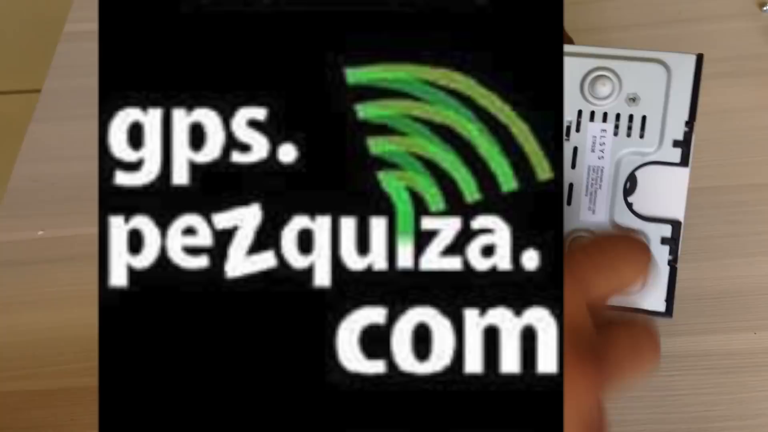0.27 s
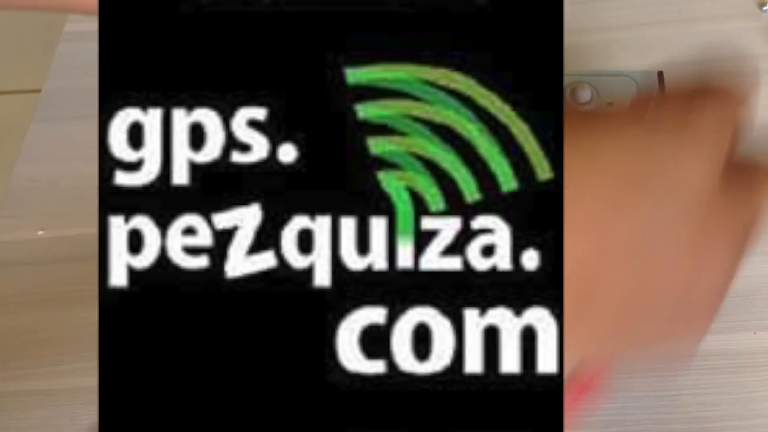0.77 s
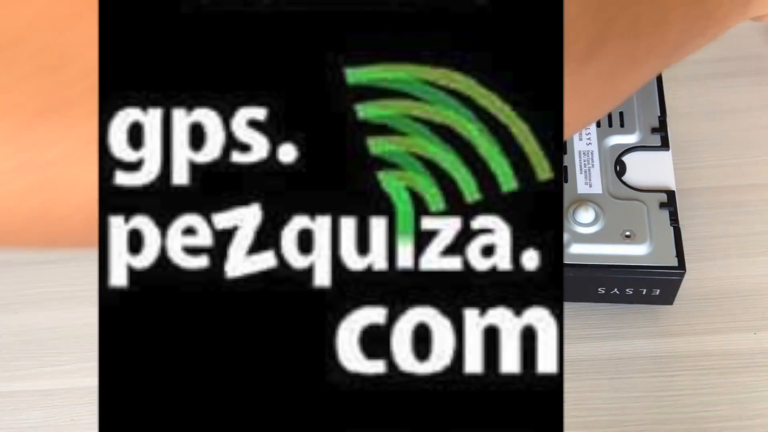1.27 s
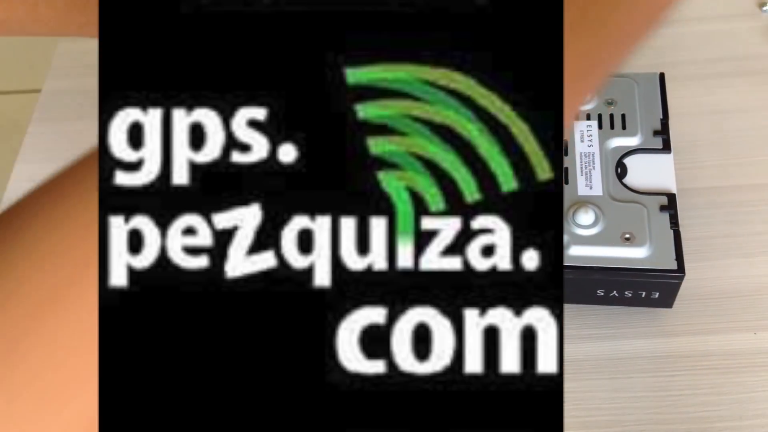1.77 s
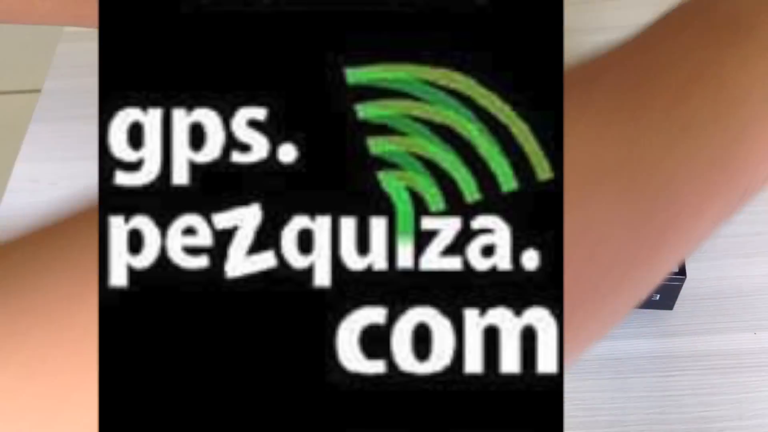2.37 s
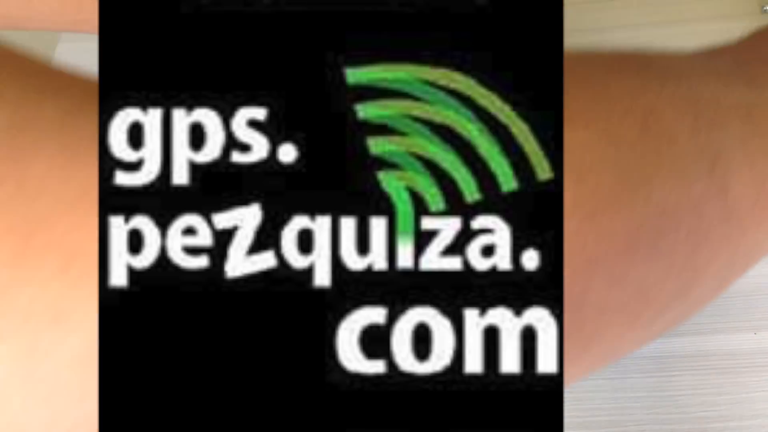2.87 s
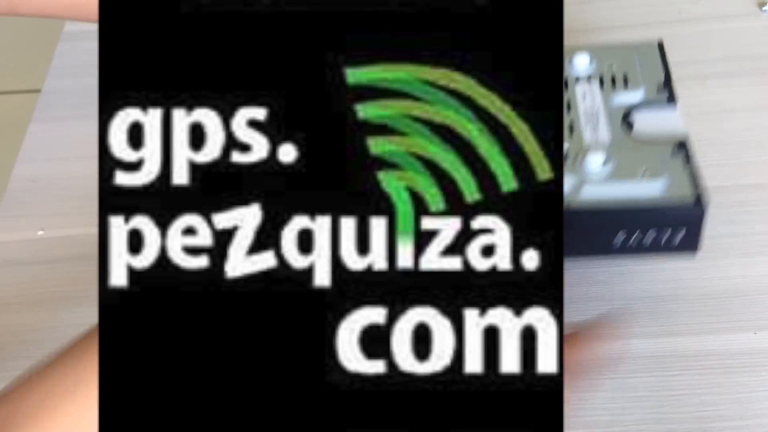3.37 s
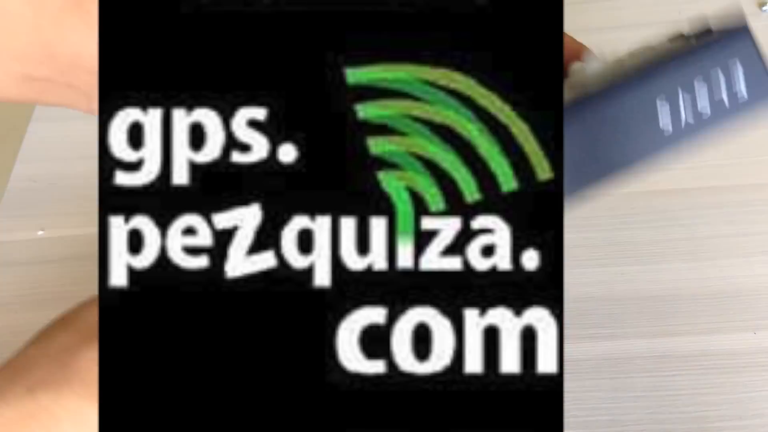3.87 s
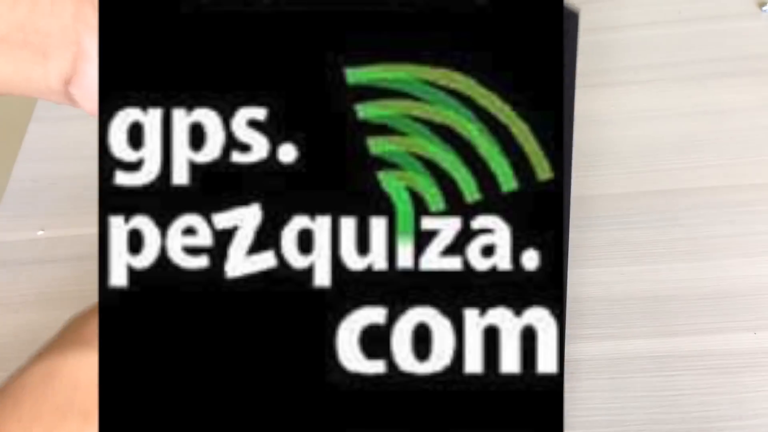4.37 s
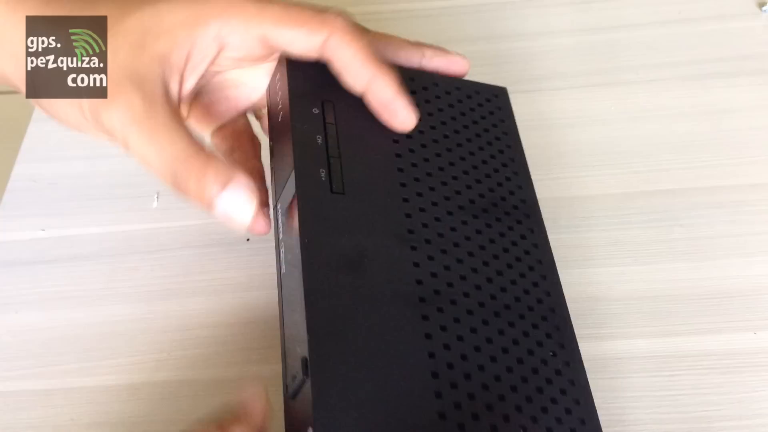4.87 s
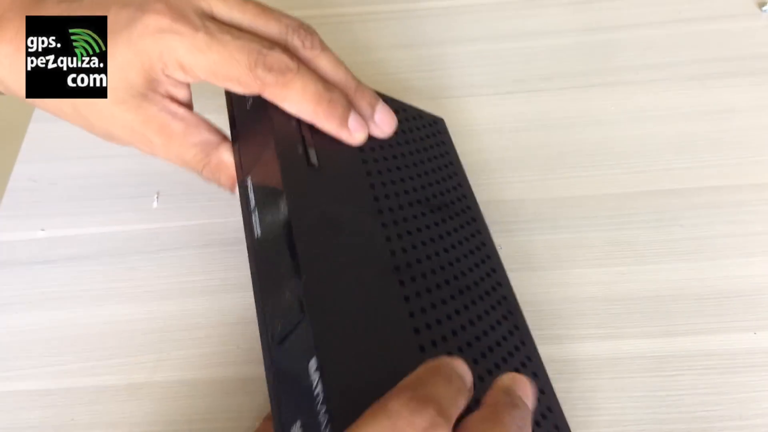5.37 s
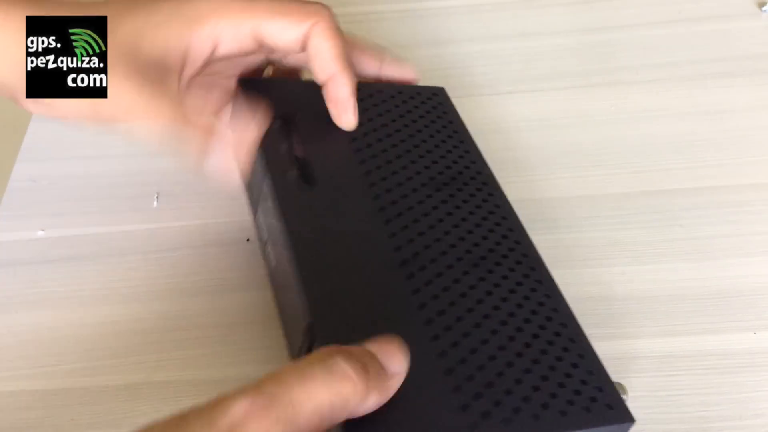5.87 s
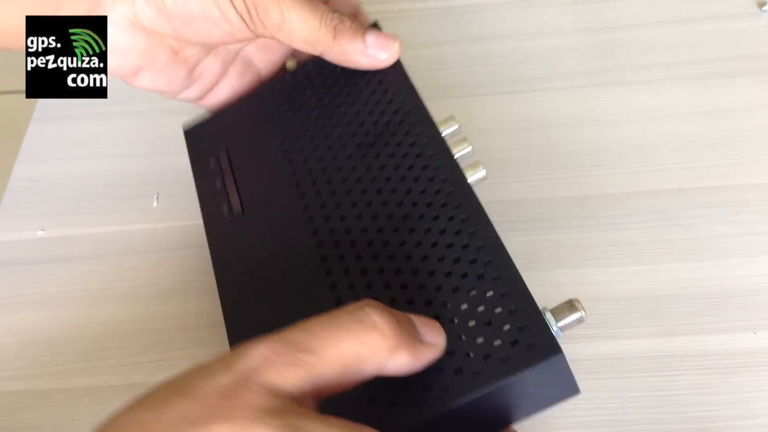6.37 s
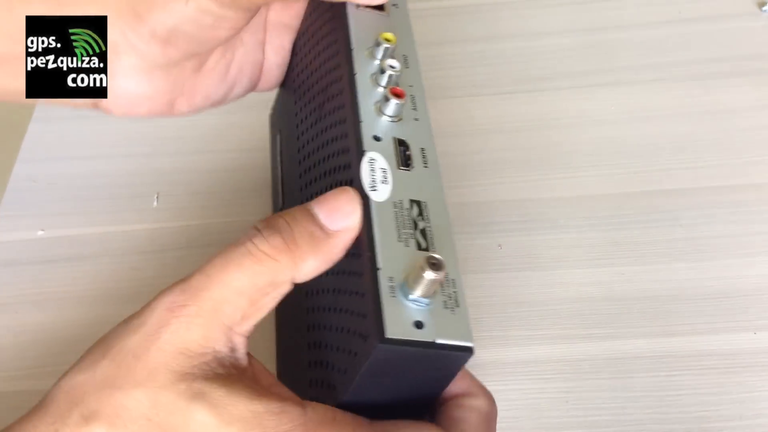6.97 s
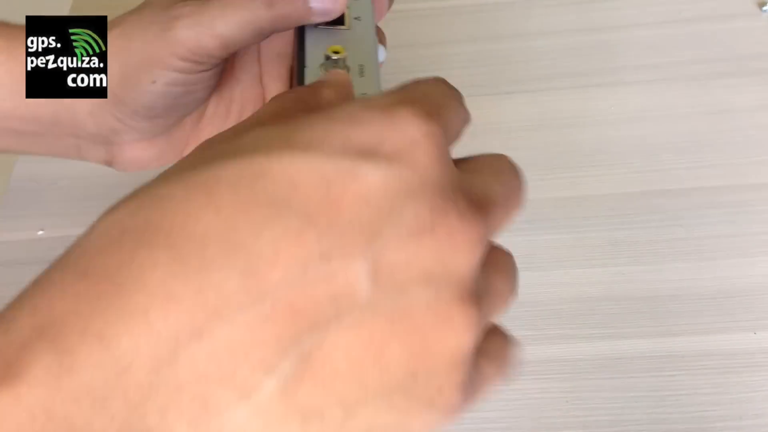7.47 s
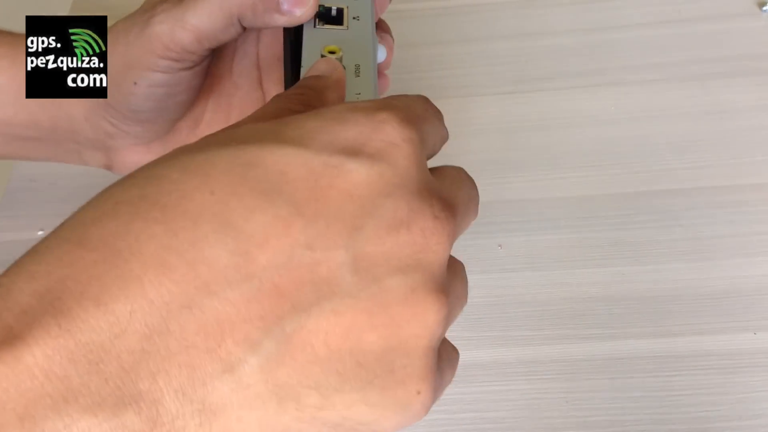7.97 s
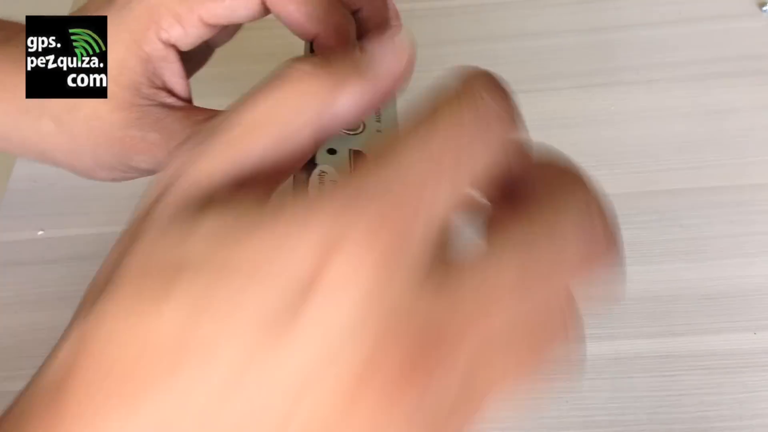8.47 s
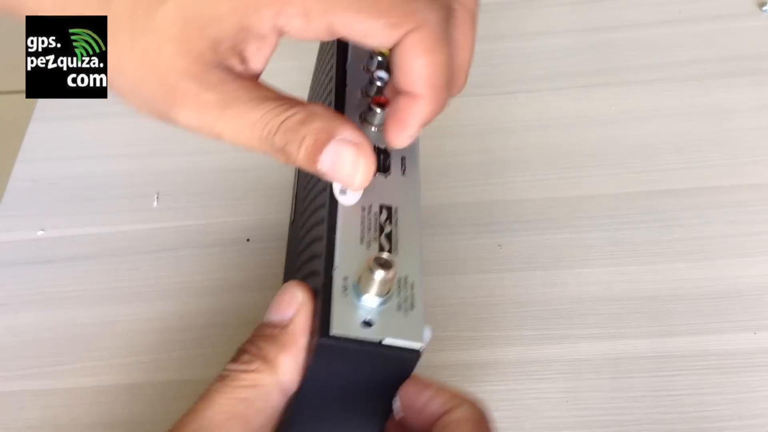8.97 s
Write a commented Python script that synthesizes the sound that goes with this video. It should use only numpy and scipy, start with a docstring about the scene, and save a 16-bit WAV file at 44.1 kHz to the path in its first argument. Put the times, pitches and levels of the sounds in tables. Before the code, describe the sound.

A small screw ticks to rest, a screwdriver clatters down, then a sheet-metal case is lifted and turned with hard clacks, hollow thuds and rubbing.

```python
"""Close mono take of hands working on a small sheet-metal and plastic case on a wooden table, in a quiet room.
First the cover clacks, the hollow body thuds and fingers rub it: noise bursts, decaying modes, stick-slip noise.
Then a screwdriver touches down, a small screw bounces to rest in quickening ticks, and the tool is put down
with a clatter. Last the case is lifted, turned over and gripped: louder clacks and thuds, an edge juddering
in runs of clacks, scrapes, and squeaks of unsteady tone. Filtered noise is the hush throughout."""
import sys
import numpy as np
from scipy import signal
from scipy.fft import rfft, irfft, next_fast_len
from scipy.io import wavfile
from scipy.ndimage import uniform_filter1d, map_coordinates

SR = 44100
rng = np.random.default_rng(int(sys.argv[2]) if len(sys.argv) > 2 else 0)


def output_pcm(signal):
    """Save a mono or channel-first signal as 16-bit PCM at the path in sys.argv[1].

    Samples are clipped to [-1, 1] before scaling.
    """
    pcm = np.clip(np.atleast_2d(signal).T, -1, 1) * 32767
    wavfile.write(sys.argv[1], SR, np.round(pcm).astype(np.int16))


N = 406161  # length, samples

# Event levels are nominal: the room, the table path and trims in the functions act on them too.
# room air and microphone hiss: [freq_hz, density_db]
HUSH_SPECTRUM = [(15, -63), (25, -35), (49, -10.5), (91, -7.5), (313, -2), (550, -8), (646, -9.5),
                 (967, -9.5), (1330, -13), (2170, -13), (2760, -12), (13800, -16), (15400, -17)]
HUSH_DB = -70  # rms level
# decay of the room's answer: [freq_hz, t60_s]
ROOM_DECAY = [(100, 0.91), (250, 0.3), (700, 0.43), (2500, 0.33), (6000, 0.29), (12000, 0.16)]
# the table top carries the sound to the microphone, with a null in the bass: [freq_hz, gain_db]
TABLE_PATH = [(25, -7.5), (50, -9.5), (85, -3.5), (102, -7.5), (121, -30), (145, 2.5), (400, -1),
              (18000, 1)]
TOP_HZ = 15450  # upper band limit at the microphone

# hard contacts of cover and chassis:
# [strike_s, level_db, centre_hz, panel_db (relative), crack_db (relative), clack_t60_s]
CLACKS = [(0.116, -34.5, 2640, -6.5, -14.5, 0.02), (0.1475, -36, 2930, -3.5, -11.5, 0.028),
          (0.161, -44.5, 960, -2, -18, 0.033), (0.6893, -47.5, 1020, 0, -18, 0.023),
          (0.9024, -56.5, 960, 11, -18, 0.01), (2.8354, -32, 1940, -9.5, -18, 0.018),
          (2.848, -38, 2950, -15, -16, 0.021), (2.8738, -44, 1936, -3, -21.5, 0.07),
          (3.8534, -11.5, 1700, -12, -12, 0.017), (4.0672, -47.5, 1300, -11, -30.5, 0.024),
          (4.4808, -44, 2560, -7, -19, 0.014), (4.9185, -44, 1520, -3.5, -33, 0.027),
          (5.2824, -55, 1656, -5, -20, 0.035), (5.4049, -20, 1605, 1.5, -18, 0.017),
          (5.4089, -27.5, 2870, -4, -14, 0.017), (6.1632, -49.5, 3560, -14, -25, 0.028),
          (6.2811, -24.5, 2960, -31, -17, 0.017), (6.4327, -35.5, 1950, -28.5, -24, 0.015),
          (6.8347, -49.5, 2910, -12, -15.5, 0.045), (7.0578, -36, 1770, 5, -20, 0.032),
          (7.5044, -33, 1445, -4.5, -30, 0.022), (8.3214, -52, 807, -18, -14, 0.031)]
# spectra of the clack, the duller panel slap and the bright crack: [freq_hz, density_db]
CLACK_SPECTRUM = [(700, -21), (1300, -1.5), (1670, -1.5), (1870, -0.5), (2080, -1), (2450, -.5), (2650, -6),
                  (2950, -3.5), (3550, -2), (4200, -3.5), (5400, -5), (8000, -17.5)]
SLAP_SPECTRUM = [(200, -16), (450, -3), (650, -0.5), (950, -1.5), (1300, -9.5), (2000, -20.5)]
CRACK_SPECTRUM = [(4500, -34), (7000, 1), (8200, -6.5), (9200, -1.5), (10800, -8), (12300, -4),
                  (14000, -15), (15500, -15.5)]
# ring of the steel chassis: [freq_hz, level_db, t60_s]
STEEL_MODES = [(984, -10, .08), (1240, -8, .08), (1665, 0, .12), (2040, -1, .12), (2448, -4, .09),
               (2823, -4, .09), (3030, -5, .08), (3541, -4, .12), (3784, -7, .1), (4258, -7, .1),
               (4453, -7, .1), (4856, -7, .11), (5181, -5, .12)]

# soft blows on the hollow case, damped more by a firm grip:
# [start_s, thud_db, panel_db (relative), boom_db (relative), thud_t60_s]
KNOCKS = [(0.154, -55, -12, -23, 0.089), (0.438, -50, -21, -23, 0.035), (0.618, -41.5, -29, -32, 0.13),
          (0.8, -36.5, -14, -38, 0.11), (2.785, -49, -23, -11, 0.23), (3.855, -21.5, -7.5, -18, 0.14),
          (3.912, -28.5, -7.5, -18, 0.17), (4.038, -32, -8.5, -28, 0.12), (4.067, -32, -10, -29, 0.081),
          (4.142, -15.5, -10, -19.5, 0.082), (4.195, -33, -2, -22, 0.06), (4.404, -27, -5.5, -11, 0.11),
          (4.479, -22.5, -10.5, -17, 0.11), (4.755, -42, -1.5, -20, 0.072), (4.92, -46.5, -6.5, -20, 0.22),
          (5.113, -45, 1, -22, 0.1), (5.272, -52, 3.5, -20, 0.11), (5.406, -19, -7.5, -33, 0.061),
          (5.522, -34.5, 7, -25.5, 0.13), (5.573, -41, 2, -27, 0.079), (5.6, -31.5, 1.5, -31, 0.091),
          (6.061, -40, -21, -9, 0.2), (7.058, -27, 2, -18, 0.033), (7.076, -36, -14.5, -19, 0.1),
          (7.505, -34.5, 1, -18, 0.066), (7.746, -46.5, -15, -23, 0.065), (8.215, -52.5, -9, -24, 0.05),
          (8.32, -38, -11, -17, 0.092), (8.457, -46.5, -21.5, -10, 0.053), (8.714, -53.5, -22, -16, 0.04),
          (8.829, -53, -10, -20, 0.058), (8.975, -32.5, -6.5, -22, 0.064)]
# resonances of the hollow body: [freq_hz, level_db]
BODY_MODES = [(158, -0.5), (192, 11.5), (230, -12.5)]
# bending modes of the panels: [freq_hz, level_db, t60_s]
PANEL_MODES = [(295, -2, 0.081), (358, -0.5, 0.11), (377.5, 3, 0.052), (426, -1.5, 0.0854),
               (479, 0.5, 0.056), (537, -9, 0.14), (603, 1, 0.0313), (659, -6.5, 0.062), (830, -12, 0.044)]

# finger strokes, swelling or easing from start to end:
# [start_s, length_s, swell_db, drag_db, rub_db, scrape_db]
STROKES = [(0.41, 0.21, 6, -68.5, -78, -98), (0.643, 0.17, -3.5, -50.5, -55.5, -68.5),
           (.95, 0.31, -1, -81, -71, -75.5), (1.73, 0.18, 0, -99, -85, -69.5),
           (2.377, 0.22, -3, -69, -80, -73.5), (4.083, 0.068, 8.5, -35.5, -40.5, -57.5),
           (4.184, 0.24, 3, -47, -54, -59.5), (4.425, 0.2, 2, -43.5, -45, -64),
           (4.73, 0.21, -17.5, -58, -62, -73), (5.16, 0.28, 3, -64, -59.5, -66),
           (5.424, 0.058, -4, -49, -48.5, -56), (5.538, 0.13, -4, -46.5, -40, -56.5),
           (5.721, 0.12, 1.5, -52.5, -44, -56), (6.042, 0.013, -1, -83, -74, -57),
           (6.098, 0.19, 2, -66, -73.5, -68.5), (8.74, 0.15, -2, -72.5, -76.5, -74.5),
           (9.098, 0.13, 9, -67.5, -80, -59)]
GRAB_S, RELEASE_S = 0.036, 0.038  # times for a 20 dB rise before a stroke and a 20 dB fall after it
# spectra of skin drag, panel rub and edge scrape: [freq_hz, density_db]
DRAG_SPECTRUM = [(40, -51), (85, -28), (118, -29), (155, -4), (200, 2.5), (240, -3), (300, -30.5),
                 (500, -51)]
RUB_SPECTRUM = [(180, -24.5), (270, -2.5), (350, 5.5), (410, 0.5), (500, 0.5), (660, -4.5), (850, -13.5),
                (1100, -12), (1800, -24)]
SCRAPE_SPECTRUM = [(700, -13), (1250, -5.5), (1550, 1.5), (1800, -4), (2150, 1.5), (2550, -3.5), (2950, -3),
                   (3600, -6), (4600, -11), (5700, -14.5), (7500, -21.5), (15000, -27)]

# rubbing excites one resonance, a squeak or a groan: [start_s, length_s, pitch_hz, level_db, width_hz]
SQUEAKS = [(0.623, 0.22, 931, -57.5, 409), (2.674, 0.05, 3110, -72, 160), (4.203, 0.009, 2940, -44.5, 454),
           (4.542, 0.13, 2800, -67.5, 120.3), (4.654, 0.041, 1545, -63, 120),
           (8.81, 0.083, 2160, -71.5, 405), (5.568, 0.099, 641, -49.5, 263), (5.739, 0.11, 570, -51, 171),
           (6.272, 0.006, 2170, -40, 299.3), (6.278, 0.0046, 2543, -28, 800),
           (8.423, 0.038, 2096, -62, 926), (9.102, 0.35, 2464, -55.5, 225), (9.123, 0.26, 1800, -59, 310)]

# small hard contacts of the screwdriver, and the screw's first landing at 1.575 s:
# [contact_s, level_db, crack_db (relative), ring_db (relative)]
HARD_CONTACTS = [(1.5647, -45, -22, -17), (1.575, -35.5, -21, -40), (2.1087, -46, -14, -2.5),
                 (2.1315, -48, -24, -30), (2.156, -52, -20, -12), (2.2921, -51, -15, -1.5),
                 (2.7809, -19.5, -15, -17), (2.7963, -17.5, -7.5, -25.5), (2.8058, -16, -24.5, -26.5),
                 (3.3811, -37, -23, -16)]
# ring of small metal parts, chiefly the screwdriver's shaft: [freq_hz, level_db, t60_s]
METAL_MODES = [(3090, -5, .016), (5370, 1, 0.016), (5890, -2, 0.023), (8140, -2.5, .02), (8150, 5, 0.018),
               (9050, -1, 0.0091)]
# spectrum of a small hard contact: [freq_hz, density_db]
TICK_SPECTRUM = [(150, -24), (700, -10.5), (1600, -5), (2100, 1), (3200, 3), (5200, 3), (7000, -6),
                 (9000, -21)]
TICK_T60 = 0.018  # s, decay after the snap of a tool or screw contact

# the run of bounces that follows the screw's first landing
SCREW_S, SCREW_DB = 1.6342, -38.5  # first bounce of the run: time, level
FLIGHT_S, FLIGHT_SHARE = 0.0432, 0.895  # flight after it, and each later flight as a share of the one before
BOUNCE_LOSS_DB = 2.2  # per bounce

# an edge judders along the case at a steady pace:
# [start_s, end_s, catches_per_s, first_level_db, loss_db_per_catch]
JUDDERS = [(4.142, 4.2, 76, -34, 3.5), (4.248, 4.44, 27.5, -44.5, 0.8)]
JUDDER_HZ = 2000  # centre of the modes that a catch excites

LEAD = 0.012  # s, an edge slides this long before it strikes
AGE = np.arange(SR // 3) / SR  # s, time axis of one blow


def amp(db):
    """Decibels to gain."""
    return 10 ** (np.asarray(db) / 20)


def unit(x):
    """Scale to rms 1."""
    return x / np.sqrt(np.mean(x ** 2) + 1e-20)


def crest(x, size=128):
    """Scale so that the loudest few milliseconds have rms 1."""
    power = uniform_filter1d(x ** 2, size, mode="constant")
    return x / np.sqrt(power.max() + 1e-20)


def along(points, hz):
    """Read (freq_hz, value) points on a log frequency axis."""
    f, v = np.transpose(points)
    return np.interp(np.log(hz + 1), np.log(f + 1), v)


def colour(x, points):
    """Causal minimum-phase filter with the given spectrum, falling away beyond its ends."""
    m = 2 * next_fast_len(len(x) // 2 + 2048)
    closed = [(points[0][0] / 2, -70), *points, (points[-1][0] * 2, -70)]
    gain = amp(along(closed, np.fft.rfftfreq(m, 1 / SR)))
    # folding the cepstrum onto positive time makes the filter causal
    cepstrum = irfft(np.log(gain))
    cepstrum[1:m // 2] *= 2
    cepstrum[m // 2 + 1:] = 0
    response = np.exp(rfft(cepstrum))
    return irfft(rfft(x, m) * response)[:len(x)]


def fade(t60, t=AGE):
    """Exponential decay, 60 dB down after t60 (at least 1 ms)."""
    return np.exp(-np.log(1000) * t / np.maximum(t60, 1e-3))


def wobble(rate, size=N):
    """A smooth random curve, rate knots a second."""
    knots = rng.standard_normal(int(size * rate / SR) + 4)
    return map_coordinates(knots, [np.arange(size) * rate / SR])


def add(track, s, sound):
    """Mix a sound into a track at time s."""
    part = track[max(round(s * SR), 0):][:len(sound)]
    part += sound[:len(part)]


def burst(points, t60, slide_db, snap, snap_t60=0.0028, size=150):
    """A brief slide ends in a hard snap, which shakes many close, heavily damped modes evenly."""
    t = AGE - LEAD
    slide = amp(slide_db) * (AGE / LEAD) ** 2
    decay = fade(t60, abs(t)) + snap * fade(snap_t60, abs(t))
    envelope = np.where(t < 0, slide, decay)
    z = rfft(rng.standard_normal(len(AGE)) * envelope)
    # dividing by the smoothed spectrum evens out the modes
    smooth = np.sqrt(uniform_filter1d(abs(z) ** 2, size))
    even = irfft(z / smooth, len(AGE))
    return crest(colour(even, points))


def ring(modes, scatter_db):
    """Separate decaying modes, struck at new strengths and signs by each blow."""
    hz, db, t60 = np.transpose(modes)[:, :, None]
    strength = amp(db + scatter_db * rng.standard_normal(db.shape))
    gain = strength * rng.choice([-1, 1], db.shape)
    return crest(np.sum(gain * fade(t60) * np.sin(2 * np.pi * hz * AGE), axis=0))


def in_room(x, wet_db, build=0.0039):
    """The sound plus the answer of the walls: noise that builds up, then dies at a rate set by pitch."""
    hz, t, z = signal.stft(rng.standard_normal(len(AGE)), SR, nperseg=256)
    decay = fade(along(ROOM_DECAY, hz)[:, None], t)
    tail = signal.istft(z * decay, SR, nperseg=256)[1][:len(AGE)]
    tail *= 1 - np.exp(-(AGE / build) ** 2)
    response = amp(wet_db) * tail / np.linalg.norm(tail)
    response[0] += 1  # direct sound
    return signal.fftconvolve(x, response)[:len(x)]


def hush():
    """Room air and microphone hiss: steady coloured noise."""
    return amp(HUSH_DB) * unit(colour(rng.standard_normal(N), HUSH_SPECTRUM))


def strike(centre_hz, panel_db, crack_db, t60, focus_db=3):
    """An edge strikes: a crack, a clack, a slap of the panel, a decaying tone and a faint ring of steel."""
    # the place that is struck favours the modes near its own pitch
    excited = [(hz, level - focus_db * np.log2(hz / centre_hz) ** 2) for hz, level in CLACK_SPECTRUM]
    clack = amp(-8) * burst(excited, t60, slide_db=-24.5, snap=0.4)
    slap = amp(panel_db - 7) * burst(SLAP_SPECTRUM, 2.06 * t60, slide_db=-27, snap=0.4)
    crack = amp(crack_db - 6) * burst(CRACK_SPECTRUM, 1.4 * t60, slide_db=-32, snap=0.37)
    hit = clack + slap + crack
    tone = fade(t60) * np.sin(2 * np.pi * centre_hz * AGE)
    add(hit, LEAD, amp(-5) * tone)
    add(hit, LEAD, amp(-26) * ring(STEEL_MODES, scatter_db=1.5))
    return in_room(hit, wet_db=-11.5)


def cover():
    """Single hard contacts of the cover and chassis, each snapping at its listed time."""
    out = np.zeros(N)
    for strike_s, level_db, centre_hz, panel_db, crack_db, t60 in CLACKS:
        add(out, strike_s - LEAD, amp(level_db) * strike(centre_hz, panel_db, crack_db, t60))
    return out


def knocks(rise=0.002, boom_hz=88, boom_delay=0.016, boom_t60=0.075):
    """Palms and the table bump the case: body thuds, panels bend, and a low boom follows from the room."""
    out = np.zeros(N)
    tones = sum(amp(db) * np.sin(2 * np.pi * hz * AGE) for hz, db in BODY_MODES)
    body = (1 - np.exp(-AGE / rise)) * tones
    boom_envelope = (1 - np.exp(-AGE / 0.0089)) * fade(boom_t60)
    boom = crest(boom_envelope * np.sin(2 * np.pi * boom_hz * AGE))
    for start_s, thud_db, panel_db, boom_db, t60 in KNOCKS:
        thud = amp(-3) * crest(body * fade(t60))
        panels = amp(panel_db - 4) * ring(PANEL_MODES, scatter_db=4)
        blow = thud + panels
        add(blow, boom_delay, amp(boom_db) * boom)
        add(out, start_s, amp(thud_db) * in_room(blow, wet_db=-14))
    return out


def pressure(start_s, length_s, swell_db):
    """Gain of one stroke: it takes hold, swells or eases evenly in dB, and lets go."""
    t = np.arange(N) / SR - start_s
    edges_db = 20 * (np.minimum(t, 0) / GRAB_S - np.maximum(t - length_s, 0) / RELEASE_S)
    swell = swell_db * (np.clip(t / length_s, 0, 1) - 0.5)  # zero at mid-stroke
    return amp(np.maximum(edges_db, -120) + swell)


def slips(rate, spread_db):
    """Stick and slip: tiny pushes of random sign, strength and moment, rate a second on average."""
    happens = rng.random(N) < rate / SR
    strength = amp(spread_db * np.clip(rng.standard_normal(N), -2, 2))
    return happens * rng.choice([-1, 1], N) * strength


def fingers():
    """Skin drags on the case and shakes body and panels; edges and nails add a gritty scrape."""
    drag, rub, scrape = sum(np.outer(amp(levels_db), pressure(start_s, length_s, swell_db))
                            for start_s, length_s, swell_db, *levels_db in STROKES)
    # the finger catches and lets go, so the rub and scrape slips come in clumps
    catch = np.clip(wobble(140), -2, 1.3)
    pulls = slips(rate=1200, spread_db=5.5)
    rubs = amp(2 * catch) * slips(rate=900, spread_db=3.5)
    scratches = amp(2.6 * catch) * slips(rate=4000, spread_db=2.5)
    low = amp(-0.5) * drag * unit(colour(pulls, DRAG_SPECTRUM))
    mid = amp(-6) * rub * unit(colour(rubs, RUB_SPECTRUM))
    grit = amp(-3.5) * scrape * unit(colour(scratches, SCRAPE_SPECTRUM))
    return in_room(low + mid + grit, wet_db=-12)


def squeaks():
    """Fast stick and slip drives one resonance, with unsteady strength and phase."""
    out = np.zeros(N)
    for start_s, length_s, pitch_hz, level_db, width_hz in SQUEAKS:
        t = np.arange(int(length_s * SR)) / SR
        knot_rate = 1.2 * width_hz
        grip = wobble(knot_rate, size=len(t)) + 1j * wobble(knot_rate, size=len(t))
        tone = unit(np.real(grip * np.exp(2j * np.pi * pitch_hz * t)))
        swell = np.sin(np.pi * t / length_s)
        add(out, start_s, amp(level_db) * swell * tone)
    return in_room(out, wet_db=-38)


def tick(crack_db):
    """The very short, bright contact of a small hard object."""
    contact = amp(-11) * burst(TICK_SPECTRUM, TICK_T60, slide_db=-41, snap=1.6)
    crack = burst(CRACK_SPECTRUM, TICK_T60, slide_db=-46, snap=4, snap_t60=0.0032)
    return contact + amp(crack_db + 2) * crack


def hard_contacts():
    """Each small hard contact ticks, and metal rings for a moment."""
    out = np.zeros(N)
    for contact_s, level_db, crack_db, ring_db in HARD_CONTACTS:
        hit = tick(crack_db)
        add(hit, LEAD, amp(ring_db - 4.5) * ring(METAL_MODES, scatter_db=2))
        add(out, contact_s - LEAD, amp(level_db) * in_room(hit, wet_db=-13.5))
    return out


def screw_bounces(count=11):
    """Each bounce loses energy, so the screw lands ever faster and fainter."""
    out = np.zeros(N)
    for k in range(count):
        bounce_s = SCREW_S + FLIGHT_S * np.sum(FLIGHT_SHARE ** np.arange(k))
        level_db = SCREW_DB - BOUNCE_LOSS_DB * k
        add(out, bounce_s - LEAD, amp(level_db) * in_room(tick(crack_db=-19), wet_db=-14))
    return out


def judders():
    """A sliding edge catches again and again: a run of small, fading clacks."""
    out = np.zeros(N)
    for start_s, end_s, rate, first_db, loss_db in JUDDERS:
        for k, catch_s in enumerate(np.arange(start_s, end_s, 1 / rate)):
            catch = strike(JUDDER_HZ, panel_db=-19, crack_db=-18.5, t60=0.026)
            add(out, catch_s - LEAD, amp(first_db - loss_db * k) * catch)
    return out


def scene():
    """All handling sounds, carried by the table top, over the hush of the room."""
    handling = cover() + knocks() + fingers() + squeaks() + hard_contacts() + screw_bounces() + judders()
    return (colour(handling, TABLE_PATH) + hush())[None]


def record(dry):
    """The microphone channel keeps nothing at or above its band limit."""
    m = next_fast_len(N + SR // 2)
    passes = np.fft.rfftfreq(m, 1 / SR) < TOP_HZ
    return irfft(rfft(dry, m) * passes, m)[:, :N]


dry = scene()
out = record(dry)
output_pcm(out)
```